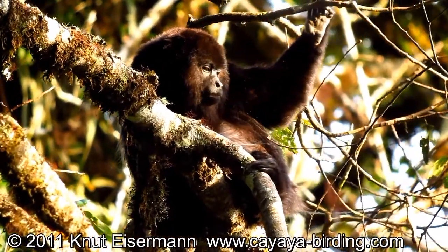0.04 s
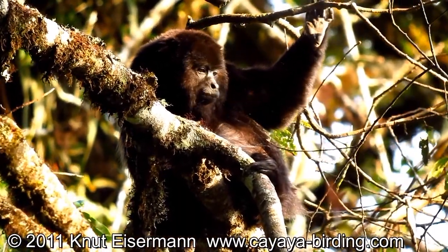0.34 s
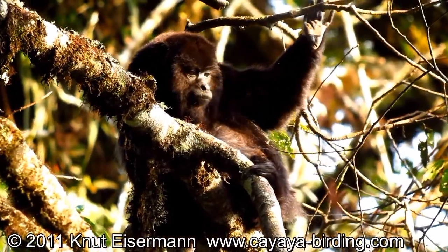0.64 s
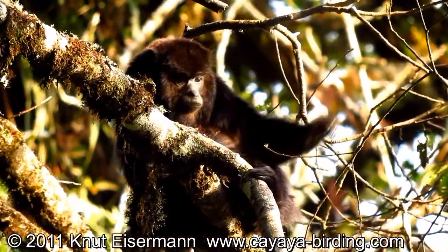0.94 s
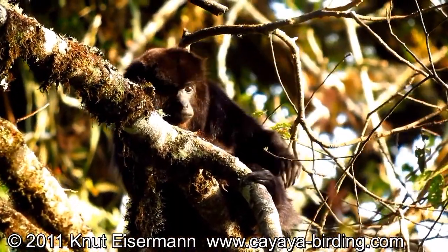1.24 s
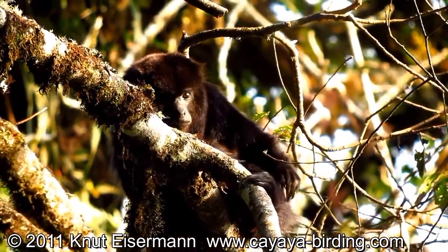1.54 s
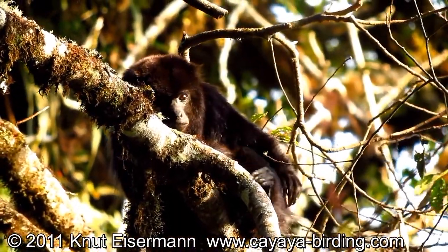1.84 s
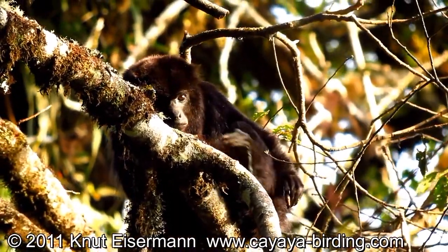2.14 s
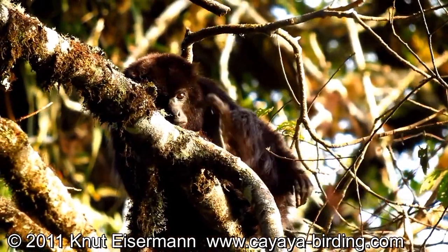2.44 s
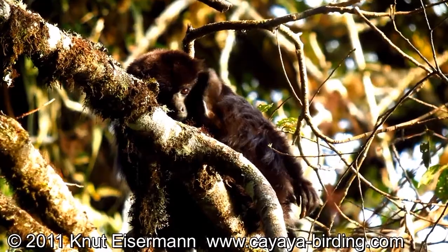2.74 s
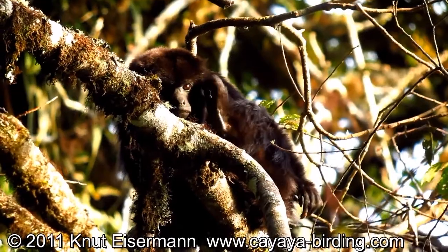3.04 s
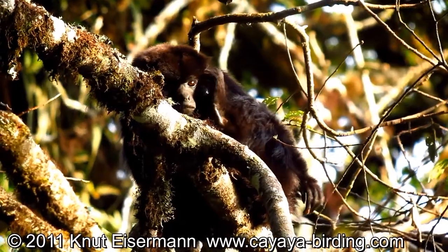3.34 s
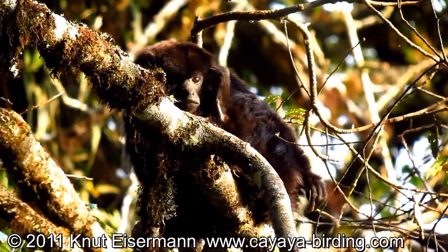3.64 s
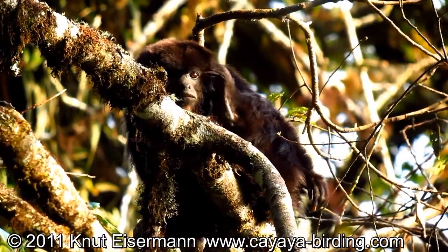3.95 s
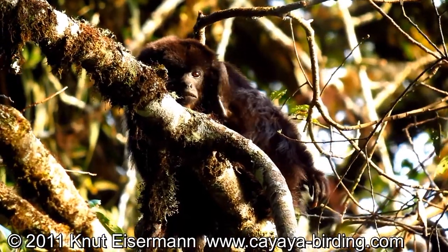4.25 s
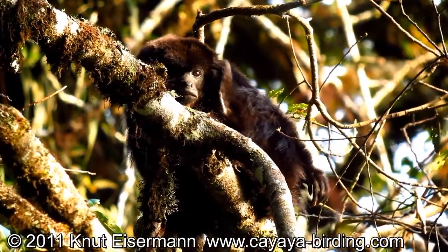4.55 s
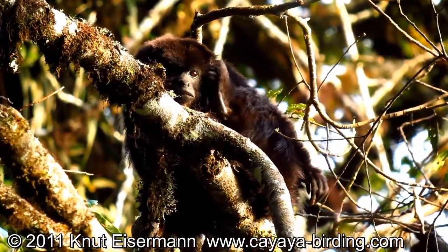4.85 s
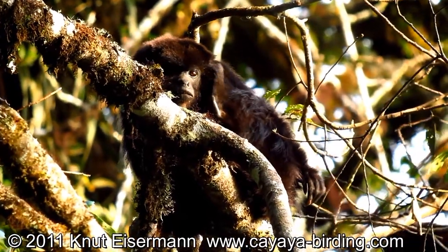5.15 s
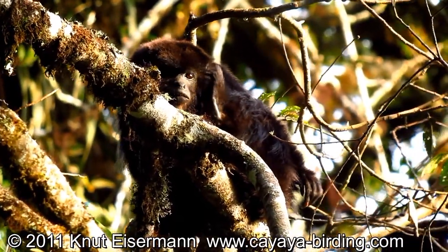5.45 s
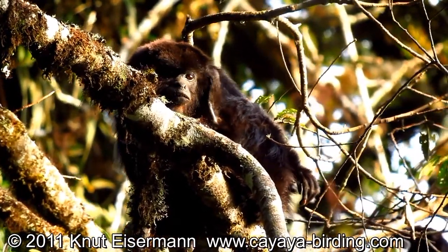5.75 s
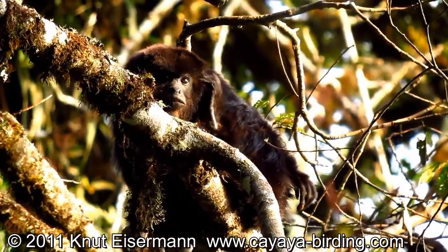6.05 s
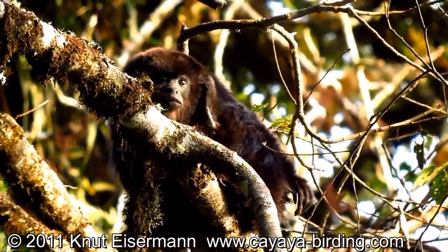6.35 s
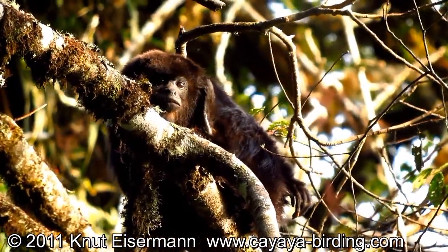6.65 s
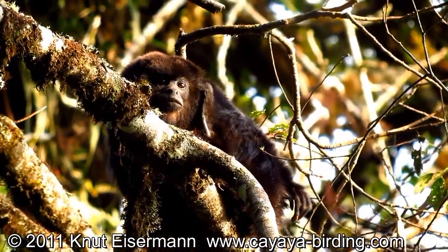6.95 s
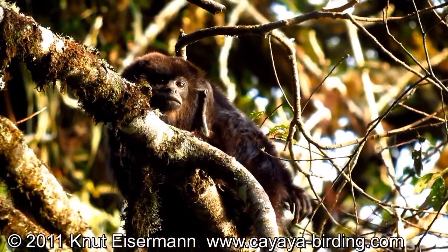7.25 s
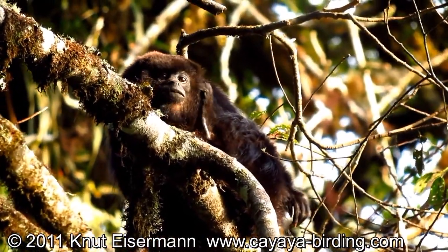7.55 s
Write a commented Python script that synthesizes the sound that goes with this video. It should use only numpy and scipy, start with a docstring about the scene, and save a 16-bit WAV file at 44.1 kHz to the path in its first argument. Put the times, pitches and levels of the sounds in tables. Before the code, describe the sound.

In a forest, twigs crackle briefly close by, then a songbird a little to the right sings a jangling song of high, gliding whistles that runs into a fast trill. A small bird gives four thin chips before the singer starts a second song. Far birds flute, twitter and rasp faintly, and a couple of drops and soft bumps land near the microphone. The notes echo lightly over a low wash of air.

```python
"""A solitaire sings two jangling songs of swept whistles, each running into a fast trill, in a tall forest.
Every note is a nearly pure, gliding tone that leaves and trunks scatter and echo.
A small bird chips with two voices at once; far birds flute, twitter and rasp.
Close by, twigs rustle in tiny cracks, and two drops and a few soft bumps land as damped taps.
Under it all lies a low wash of air."""
import sys
import numpy as np
from scipy import signal
from scipy.fft import rfft, irfft
from scipy.io import wavfile
from scipy.ndimage import uniform_filter1d

SR = 44100
rng = np.random.default_rng(int(sys.argv[2]) if len(sys.argv) > 2 else 0)


def to_wav(s):
    """Save 16-bit WAV."""
    ch = np.atleast_2d(s).T  # columns
    pcm = np.round(np.clip(ch, -1, 1) * 32767)  # PCM
    wavfile.write(sys.argv[1], SR, pcm.astype(np.int16))


N = 335601

# The solitaire strings stock phrases together. Each row: start in seconds, phrase, level in dB.
SONG_CUES = [(.966, "opening", 6.5), (1.216, "slurs", 1.5), (1.655, "lead-in", 0), (1.944, "jangle", -4),
             (2.209, "whip", 2.5), (2.306, "climb", -4.5), (2.941, "close", -4.5), (3.13, "upslur", 1.5),
             (5.654, "jangle", -8.5), (5.917, "whip", 1), (6.671, "close", -2.5), (6.858, "upslur", -1.5),
             (7.134, "flourish", 1), (7.241, "slurs", 1)]
# The notes of each phrase. Each row: seconds into the phrase, shape, length in seconds,
# turning pitch in Hz, start above that pitch in Hz, level within the phrase in dB.
PHRASE_NOTES = { "opening": [(-.004, "burr", 0.036, 6380, 704, -42.5), (.029, "slur", 0.017, 6447, 50, -28),
                (.161, "burr", .04, 6900, 500, -46), (.214, "burr", 0.042, 6040, -250, -43.5)],
                "slurs": [(.001, "sweep", 0.0286, 4674, 448, -27), (.027, "burr", 0.039, 4273, 98, -30.5),
                (.223, "slur", 0.037, 4760, -130, -31.5), (.247, "sweep", .054, 5400, 622, -23.5),
                (.343, "burr", 0.091, 8530, 700, -38.5)], "lead-in": [(0, "burr", 0.09, 3350, 207, -39),
                (.09, "burr", 0.041, 3680, -250, -35), (.14, "slur", 0.0955, 6360, -200, -24.5),
                (.172, "slur", 0.073, 3990, -150, -46), (.211, "arch", 0.081, 7260, -950, -27.5),
                (.251, "buzz", 0.046, 4820, 1647, -28), (.305, "slur", 0.07, 4120, -120, -33),
                (.333, "buzz", .04, 2770, 1343, -41.5), (.455, "slur", 0.081, 4205, -350, -32.5),
                (.55, "slur", .08, 4160, 51, -40.5)], "jangle": [(0, "arch", 0.1, 6814, -430, -23),
                (.091, "slur", 0.0171, 5210, 1516, -18.5), (.146, "slur", 0.042, 10640, -2000, -36.5),
                (.172, "slur", 0.022, 6150, -900, -24.5), (.21, "buzz", .018, 5400, -1400, -21),
                (.22, "slur", 0.0316, 4435, 892, -23)], "whip": [(.002, "scoop", 0.063, 6885, 1078, -23),
                (.149, "slur", 0.055, 3780, 452, -28), (.23, "sweep", .044, 4432, 1597, -18),
                (.28, "slur", 0.017, 5834, -150, -19.5)], "climb": [(0, "slur", 0.093, 9500, -680, -33),
                (.2, "sweep", 0.045, 5450, -1600, -26), (.24, "burr", .11, 7200, -1800, -21)],
                "close": [(.001, "arch", 0.038, 10260, -1900, -26.5),
                (.055, "slur", 0.045, 5730, 398, -17.5), (.11, "burr", 0.048, 3243, -450, -33),
                (.284, "scoop", .06, 6500, 1370, -17), (.333, "sweep", 0.0586, 6370, 408, -17)],
                "upslur": [(0, "burr", 0.036, 4935, -1100, -30.5), (.052, "sweep", 0.018, 4883, 260, -20)],
                "flourish": [(0, "burr", 0.066, 2910, -350, -41), (.157, "arch", 0.032, 10050, -1900, -32),
                (.223, "arch", .039, 7300, -3100, -30)]}
# A note glides to its pitch and may swing back. Each entry: share of the note spent gliding in,
# share of the sweep regained, bend exponent, waver as a share of the pitch.
NOTE_SHAPES = {"sweep": (1, 0, 1, .006), "slur": (0.682, 0.079, 1.905, .014),
               "scoop": (0.55, 0.26, 3, .011), "arch": (0.416, 1.05, 1.6, .014),
               "burr": (.5, .6, 1.6, .035), "buzz": (0.99, 0.12, 1.5, .07)}
# One trill per song. Each row: start in seconds, sweeps per second, level in dB before the swell.
TRILL_CUES = [(2.585, 88, -24.5), (6.295, 110, -21.5)]
# The small bird. Each row: start and length in seconds, top pitch and final fall of the main voice in Hz,
# level in dB.
CHIP_CUES = [(4.918, 0.052, 9350, 990, -38.5), (5.052, 0.07, 9740, 1950, -28),
             (5.177, 0.063, 9290, 4260, -26.5), (5.296, 0.081, 9250, 4900, -30.5)]
# Far fluting, often in chords. Each row: start and length in seconds, pitch in Hz, level in dB.
FLUTE_CUES = [(1.21, 0.28, 1920, -50), (1.628, 0.16, 1448, -57), (1.896, 0.094, 1413, -57.5),
              (2.269, 0.61, 2260, -55.5), (2.328, 0.57, 2775, -58.5), (2.437, 0.56, 2222, -47.5),
              (3.069, 0.26, 1950, -52.5), (3.41, 0.2, 3065, -58), (3.42, 0.2, 3554, -58),
              (3.459, 0.26, 2630, -58.5), (3.527, 0.18, 1387, -56), (3.683, 0.19, 3110, -55),
              (3.679, 0.31, 3580, -57.5), (3.691, 0.21, 2650, -57), (3.782, 0.21, 1384, -59.5),
              (4.162, 0.17, 2212, -51.5), (4.3, 0.21, 2193, -54), (4.287, 0.2, 3090, -51),
              (4.546, 0.19, 3070, -55), (4.761, 0.54, 2617, -58), (4.797, 0.34, 4330, -60)]
# Far twitters. Each row: start and length in seconds, first and last pitch in Hz, level in dB, voice.
TWITTER_CUES = [(3.07, 0.027, 3050, 1850, -34, "burry"), (3.718, 0.38, 9750, 8370, -54, "burry"),
                (4.042, 0.1, 6850, 7000, -38, "burry"), (4.161, 0.18, 5900, 5400, -50.5, "burry"),
                (4.168, .63, 9750, 8720, -50.5, "burry"), (4.651, 0.15, 5190, 5880, -51, "burry"),
                (4.748, 0.25, 7550, 6390, -46, "burry"), (4.932, 0.062, 5290, 5080, -46, "clear"),
                (5.005, 0.055, 5780, 6030, -45, "clear"), (5.239, 0.09, 3715, 4590, -45, "clear"),
                (5.451, 0.048, 6700, 5350, -40, "clear"), (5.486, 0.14, 5640, 7130, -41.5, "burry")]
# Each twitter voice has its own waver, as a share of the pitch.
TWITTER_WAVER = {"clear": .015, "burry": .055}
# Harsh far calls. Each row: start in seconds, level in dB ahead of the dry and reverb gains.
RASP_CUES = [(0.492, -40), (0.737, -39.5), (1.016, -40), (1.304, -40.5), (6.358, -39), (6.591, -38),
             (6.848, -40), (7.211, -43.5)]
# The rasping throat's resonances. Each row: centre in Hz, width in Hz, gain in dB.
RASP_FORMANTS = [(1700, 240, 3.5), (3300, 2240, 9.5), (4610, 460, 4.5)]
# Twigs and dry leaves. Each row: start in seconds, level in dB, fade in seconds, low-pass corner in Hz.
RUSTLE_CUES = [(0.077, -29.5, 0.059, 14000), (0.084, -16, 0.0021, 14000), (.124, -26, 0.041, 14000),
               (0.159, -17.5, 0.0065, 14000), (0.167, -28, 0.03, 14000), (.193, -27.5, 0.013, 14000),
               (3.106, -36, 0.06, 3680), (3.186, -30, 0.0083, 3500), (6.61, -36, 0.062, 1800)]
# The tone of a dry leaf. Each row: frequency in Hz, gain in dB.
LEAF_EQ = [(180, -48), (330, -7.5), (1650, -2), (6100, -5.5), (8190, -9), (11700, -13), (15000, -24)]
# Soft bumps and drops. Each row: start in seconds, settled pitch in Hz, level in dB, span in seconds.
BUMP_CUES = [(3.185, 234, -30, 0.0043), (6.488, 182, -27.5, 0.0044), (6.613, 287, -25, 0.0037),
             (6.715, 174, -18, 0.0071)]
DROP_CUES = [(5.498, 1940, -26, 0.0013), (6.505, 2670, -13.5, 0.0012)]
# How long the forest rings. Each row: frequency in Hz, seconds to fall by 60 dB.
FOREST_DECAY = [(1500, 0.55), (4000, 0.62), (7000, 0.62), (10000, 0.6)]
# The tone of the air bed. Each row: frequency in Hz, gain in dB.
AIR_EQ = [(15, -61), (25, 1.5), (215, 1), (1750, -11.5), (3090, -12), (3830, -14), (6550, -15),
          (7300, -15.5), (9050, -18), (13200, -25.5), (15500, -32)]
# The air's stereo image. Each row: frequency in Hz, left-right likeness (0 or less is fully wide).
AIR_LIKENESS = [(60, 0.13), (180, 0.34), (550, 0.38), (1650, 0.22), (4970, -0.17), (15000, 0.097)]


def solitaire():
    """The lead singer sits to the right; nearby leaves blur it a little and a group of trunks answers."""
    voice = np.zeros(N)
    for start, phrase, phrase_db in SONG_CUES:
        for s, shape, length, hz, above_hz, db in PHRASE_NOTES[phrase]:
            turn, regained, bend, waver = NOTE_SHAPES[shape]
            whistle = note(length, turn, hz, above_hz, regained * above_hz, bend, waver)
            add(voice, start + s, amp(phrase_db + db) * whistle)
    for s, rate_hz, db in TRILL_CUES:
        add(voice, s, amp(db) * trill(rate_hz))
    leaves = amp(-4) * scatter(voice, delay_s=0.002, fade_s=0.01)
    trunks = amp(-6.5) * scatter(voice, delay_s=0.0366, fade_s=0.021)
    return place(voice, lag_ms=.085, right_db=8) + leaves + trunks + amp(-7.5) * forest(voice)


def note(length, turn, turn_hz, above_hz, end_above_hz, bend, waver, swell_db=3, flutter_db=2.12):
    """The pitch glides into a turning point and curves away from it, while the note swells unevenly."""
    progress = np.linspace(0, 1, int(length * SR))
    turn = np.clip(turn, .05, .99)
    gliding_in = progress < turn
    away = np.where(gliding_in, (turn - progress) / turn, (progress - turn) / (1 - turn))
    hz = turn_hz + np.where(gliding_in, above_hz, end_above_hz) * away ** bend
    level_db = swell_db * (progress - .5) + flutter_db * wander(len(hz), size=300)
    return syrinx(hz, waver) * signal.windows.tukey(len(hz), .5) * amp(level_db)


def trill(rate_hz, length_s=0.35, attack_s=0.013, release_s=0.043, swell_db=4, duty=0.65):
    """Quick falling sweeps that sink, widen and swell, with the sound shut off while the pitch resets."""
    t = np.arange(0, length_s, 1 / SR)

    def sink(first_hz, last_hz, settle_s, power):
        return last_hz + (first_hz - last_hz) * np.exp(-(t / settle_s) ** power)

    top = sink(9650, 7250, settle_s=.062, power=3.1)
    bottom = sink(8900, 4450, settle_s=.085, power=1)
    sweep = np.minimum(t * rate_hz % 1 / duty, 1)
    gate = np.sqrt(abs(np.sin(np.pi * sweep)))
    swell = amp(swell_db * (t / length_s - 1.5))
    edges = np.clip(np.minimum(t / attack_s, (length_s - t) / release_s), 0, 1)
    return swell * edges * gate * syrinx(top + (bottom - top) * sweep)


def syrinx(hz, waver=0.0081, overtone_db=-44):
    """The bird's voice box: a nearly pure tone that follows a slightly unsteady pitch."""
    unsteady_hz = hz * (1 + waver * wander(len(hz), size=90))
    phase = 2 * np.pi * np.cumsum(unsteady_hz) / SR
    overtone = amp(overtone_db) * (2 * hz < SR / 2) * np.sin(2 * phase)
    return np.sqrt(2) * (np.sin(phase) + overtone)


def small_bird(upper_ratio=1.112, upper_db=-9, turn=0.32, rise_share=0.94):
    """Arched chips: both sides of the syrinx sound at once, a little apart in pitch."""
    voice = np.zeros(N)
    for s, length, hz, fall_hz, db in CHIP_CUES:
        rise_hz = rise_share * fall_hz
        for ratio, side_db in ((1, 0), (upper_ratio, upper_db)):
            chip = note(length, turn, ratio * hz, -rise_hz, -fall_hz, bend=3, waver=0.017, swell_db=4.5)
            add(voice, s, amp(db + side_db) * chip)
    return voice + amp(-5) * scatter(voice, delay_s=.001, fade_s=.01) + amp(-8) * forest(voice)


def far_fluting(flutter_db=3.8):
    """Far birds hold flute tones that swell and fade unevenly and ring on among the trees."""
    voice = np.zeros(N)
    for s, length, hz, db in FLUTE_CUES:
        count = int(length * SR)
        swell = np.sqrt(np.hanning(count)) * amp(flutter_db * wander(count, size=1200))
        add(voice, s, amp(db) * unit(swell) * syrinx(np.full(count, hz), waver=.005))
    return voice + amp(-5) * forest(voice)


def far_twitters():
    """Clear or burry glides, fully wet: the trees between blur them."""
    voice = np.zeros(N)
    for s, length, start_hz, end_hz, db, timbre in TWITTER_CUES:
        hz = np.linspace(start_hz, end_hz, int(length * SR))
        add(voice, s, amp(db) * syrinx(hz, TWITTER_WAVER[timbre]) * signal.windows.tukey(len(hz), .5))
    return forest(voice) + scatter(voice, delay_s=0.0014, fade_s=0.004)


def far_rasps(length_s=.075, start_hz=1680, end_hz=1200, hoarseness=1.46):
    """Each call starts as a nasal tone, then falls and turns hoarse; distance smears it."""
    def throat(hz):
        return sum(amp(db) / (1 + (2 * (hz - centre) / width) ** 2) for centre, width, db in RASP_FORMANTS)

    voice = np.zeros(N)
    progress = np.linspace(0, 1, int(length_s * SR))
    count = len(progress)
    falling_hz = start_hz + (end_hz - start_hz) * progress ** 3
    for s, db in RASP_CUES:
        jitter = 0.033 * wander(count, size=40)
        phase = 2 * np.pi * np.cumsum(falling_hz * (1 + jitter)) / SR
        tone = unit(colour(sum(np.sin(k * phase) for k in range(1, 5)), throat))
        breath = unit(colour(rng.standard_normal(count), throat))
        call = unit(progress * (tone + hoarseness * progress * breath))
        add(voice, s, amp(db) * call * signal.windows.tukey(count, .3))
    return amp(-2) * voice + amp(3) * forest(voice)


def rustles(grain_db=5, attack_s=0.0005):
    """Each brush of twigs is a dying shower of tiny cracks."""
    cracks = np.zeros((2, N))
    t = np.arange(SR // 5) / SR
    for s, db, fade_s, muffle_hz in RUSTLE_CUES:
        grains = rng.standard_normal((3, len(t)))  # centre, left, right
        grains *= amp(grain_db * np.minimum(rng.exponential(1, grains.shape), 5))
        leaf_tone = lambda hz: amp(read(LEAF_EQ, hz)) / np.hypot(1, (hz / muffle_hz) ** 2)
        crackle = unit(colour(grains[0] + grains[1:], leaf_tone))
        envelope = (1 - np.exp(-t / attack_s)) * np.exp(-t / fade_s)
        add(cracks, s, amp(db) * crackle * envelope)
    return cracks


def taps(cues, sag, grit_db):
    """Heavily damped blows: a few cycles that sink in pitch, with some contact noise."""
    blows = np.zeros(N)
    t = np.arange(SR // 10) / SR
    for s, hz, db, span_s in cues:
        age = t / span_s
        envelope = 2 * age * np.exp(1 - 2 * age)  # peaks halfway through the span
        sinking_hz = hz * (1 + sag * np.exp(-age))
        ring = np.sin(2 * np.pi * np.cumsum(sinking_hz) / SR)
        grit = unit(signal.lfilter([1], np.poly([.85, .5]), rng.standard_normal(len(t))))  # dull noise
        add(blows, s, amp(db) * envelope * (ring + amp(grit_db) * grit))
    return blows


def scatter(x, delay_s, fade_s):
    """Early reflections: a cluster off leaves and trunks, different left and right."""
    t = np.arange(SR // 4) / SR
    age = np.maximum(t - delay_s, 0)
    echoes = rng.standard_normal((2, len(t))) * np.sqrt(age) * np.exp(-age / fade_s)
    return signal.fftconvolve(x[None], unit(echoes) / np.sqrt(len(t)), axes=1)[:, :N]


def forest(x, build_s=0.016):
    """The forest's diffuse reverb tail, ringing slightly longer in the treble."""
    hz, t, spectrum = signal.stft(rng.standard_normal((2, SR)), SR, nperseg=256)
    decay = amp(-60 * t / read(FOREST_DECAY, hz)[:, None])
    onset = 1 - np.exp(-t / build_s)
    tail = signal.istft(spectrum * decay * onset, SR, nperseg=256)[1]
    return signal.fftconvolve(x[None], unit(tail) / np.sqrt(tail.shape[1]), axes=1)[:, :N]


def air(level_db=-41.5):
    """A steady bed of distant air in the canopy, partly alike on both sides and leaning a touch right."""
    likeness = lambda hz: np.clip(read(AIR_LIKENESS, hz), 0, 1)
    centre = colour(rng.standard_normal(N), lambda hz: np.sqrt(likeness(hz)))
    sides = colour(rng.standard_normal((2, N)), lambda hz: np.sqrt(1 - likeness(hz)))
    bed = unit(colour(centre + sides, lambda hz: amp(read(AIR_EQ, hz))))
    return amp(level_db) * bed * amp([[-.5], [.5]])


def place(x, lag_ms, right_db):
    """Sound from the right reaches the left side later and weaker."""
    left = colour(x, lambda hz: np.exp(-2j * np.pi * hz * lag_ms / 1000))
    return np.array([left * amp(-right_db / 2), x * amp(right_db / 2)])


def wander(count, size):
    """Random modulation that drifts over size samples, rms 1."""
    return unit(uniform_filter1d(rng.standard_normal(count), size=size))


def colour(x, gain):
    """Filters by a gain given as a function of frequency."""
    size = x.shape[-1]
    return irfft(rfft(x) * gain(np.fft.rfftfreq(size, 1 / SR)), size)


def read(points, hz):
    """Reads a curve on a log-frequency axis."""
    point_hz, value = np.transpose(points)
    return np.interp(np.log(hz + 1), np.log(point_hz + 1), value)


def add(mix, s, sound):
    """Mixes a sound in at s seconds."""
    part = mix[..., max(round(s * SR), 0):][..., :sound.shape[-1]]
    part += sound[..., :part.shape[-1]]


def amp(db):
    """Decibels to gain."""
    return 10 ** (np.asarray(db) / 20)


def unit(x):
    """Scales to rms 1."""
    return x / np.sqrt(np.mean(x ** 2) + 1e-20)


def scene():
    """The mix: solitaire in front, other birds, small close sounds and the air bed."""
    bumps = taps(BUMP_CUES, sag=0.029, grit_db=-17)
    drops = taps(DROP_CUES, sag=0.24, grit_db=-15.5)
    birds = solitaire() + small_bird() + far_fluting() + far_twitters() + far_rasps()
    return birds + rustles() + bumps + drops + air()


def record(dry, notch_hz=8200, notch_width_hz=400, cutoff_hz=15800):
    """Master EQ: a deep notch in the treble, then a steep low-pass."""
    notch = lambda hz: ((hz - notch_hz) ** 2 / ((hz - notch_hz) ** 2 + notch_width_hz ** 2)) ** 2
    low_pass = signal.firwin(511, cutoff_hz, window=("kaiser", 9), fs=SR)
    return signal.oaconvolve(colour(dry, notch), low_pass[None], "same")


dry = scene()
out = record(dry)
to_wav(out)
```